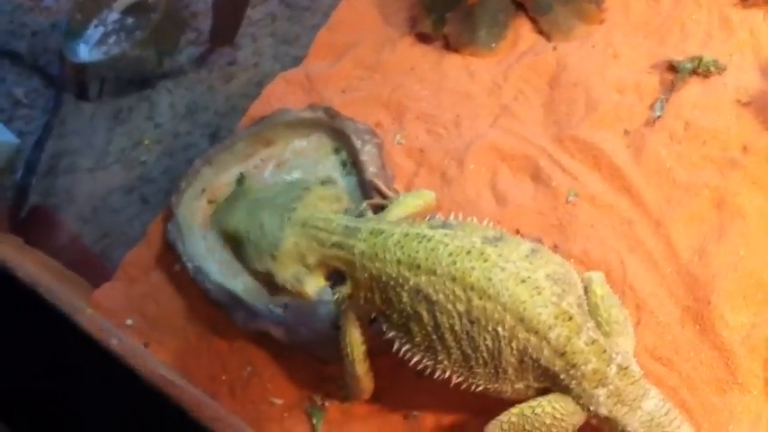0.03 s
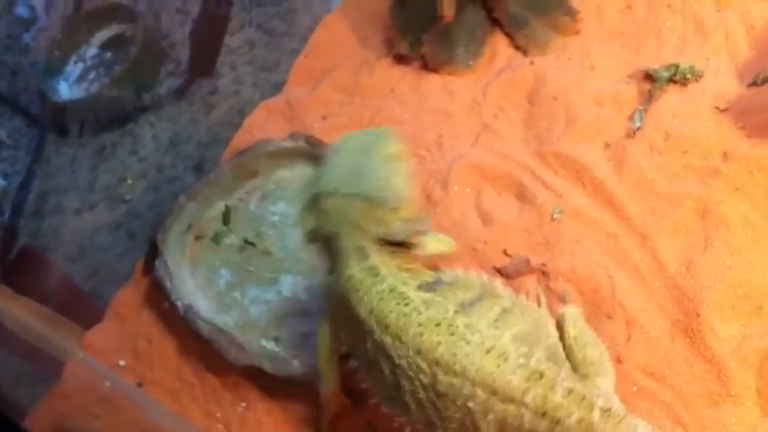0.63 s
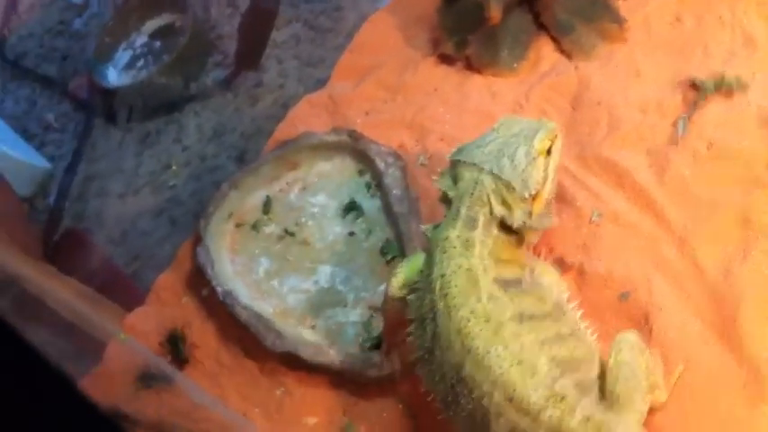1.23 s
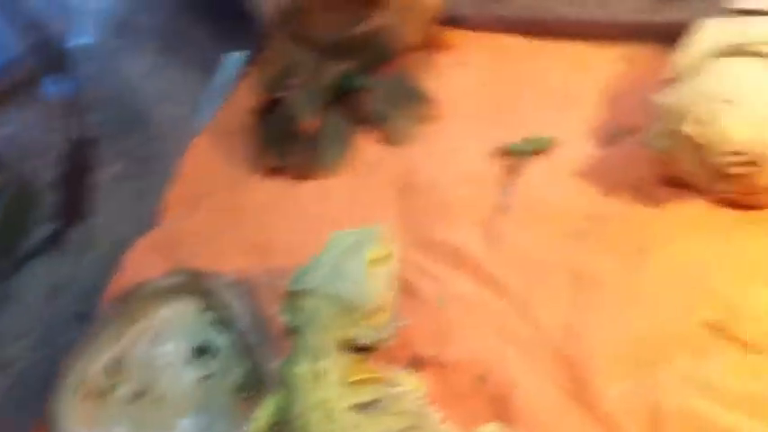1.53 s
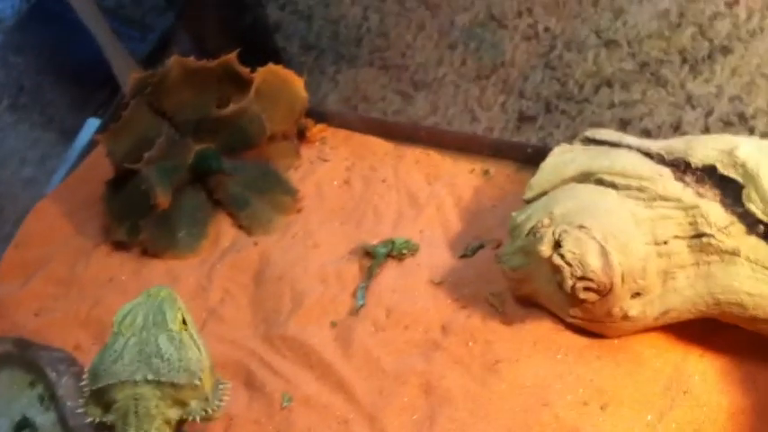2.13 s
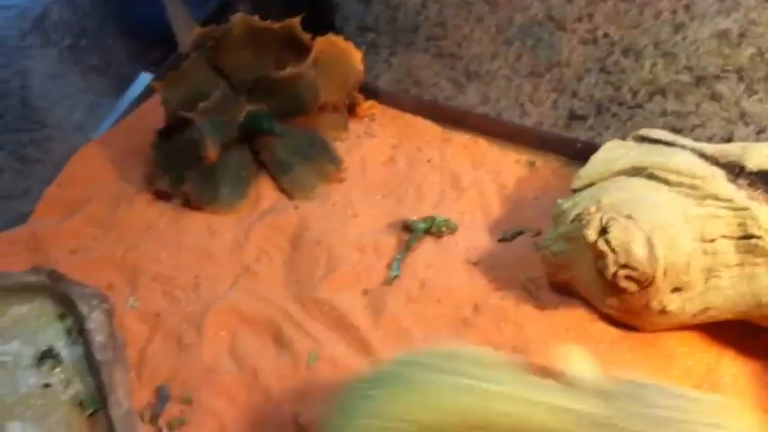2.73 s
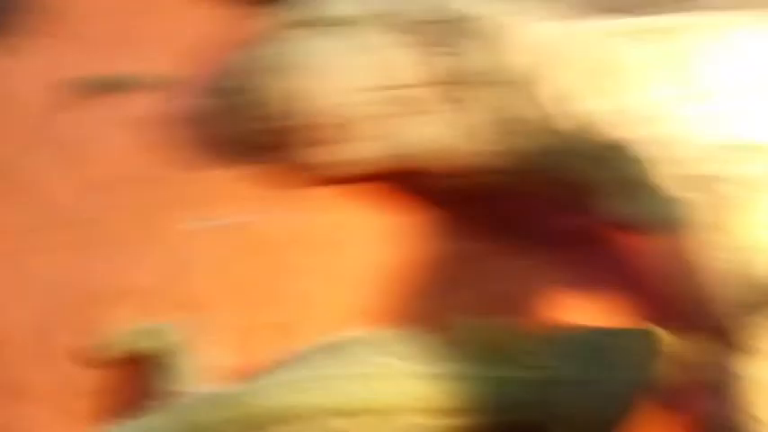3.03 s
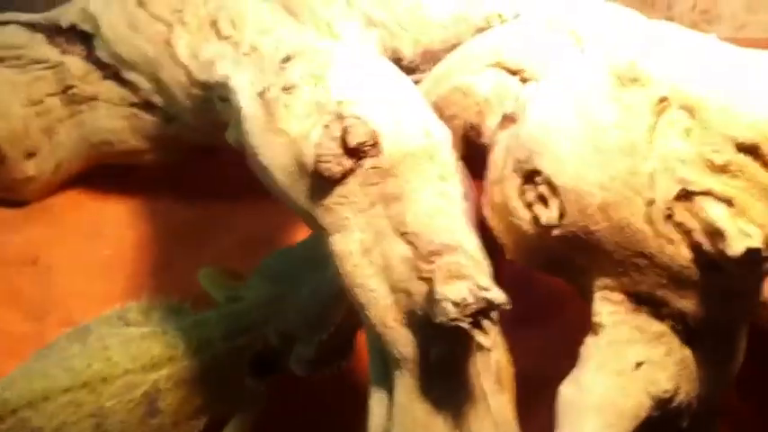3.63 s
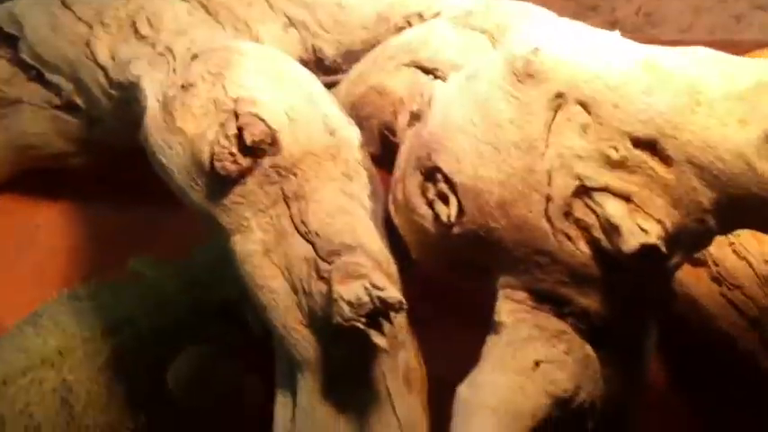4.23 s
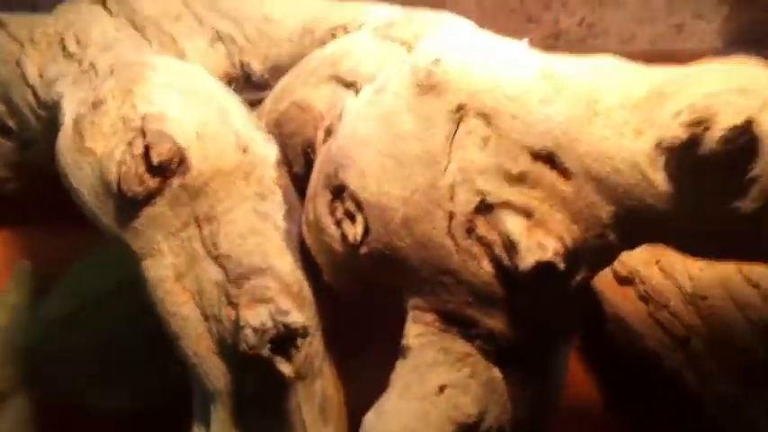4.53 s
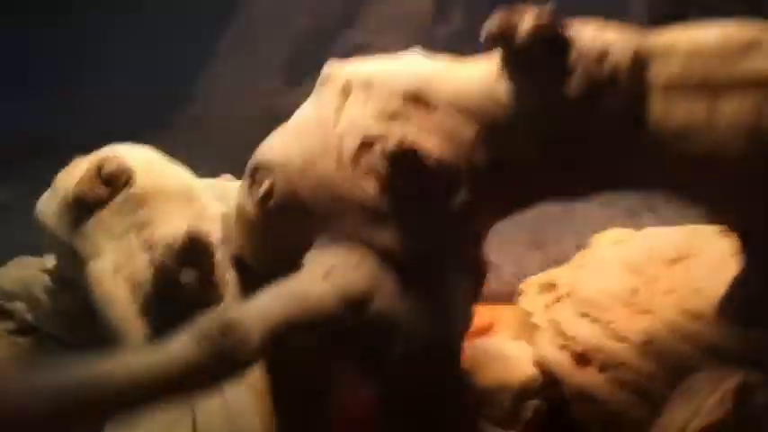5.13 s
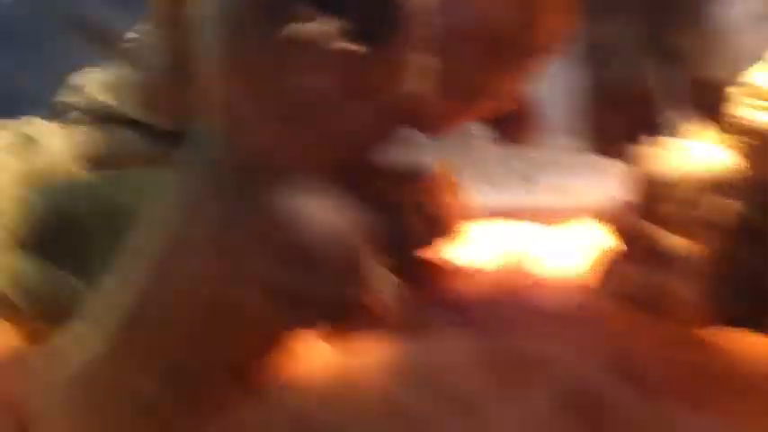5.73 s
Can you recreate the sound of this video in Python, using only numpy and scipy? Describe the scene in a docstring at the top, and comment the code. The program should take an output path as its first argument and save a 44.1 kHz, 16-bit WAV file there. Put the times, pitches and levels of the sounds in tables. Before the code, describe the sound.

A lizard's claws tick and scrape over sand, with soft thumps and a sharp snap on wood, then microphone handling noise over faint hiss.

```python
"""Claws and scales tick on grit as a lizard leaves its stone dish and scurries over sand to driftwood
in a glass tank. Its belly drags with a rasp of sliding friction, its steps drive the low modes of the
tank floor, and a claw slips and snaps against the wood. Near the end the hand-held camera adds a few
clicks, the rumble of a shifting grip and a brushing swish. Hiss and a faint hum lie underneath."""
import sys
import numpy as np
from scipy import signal
from scipy.fft import rfft, irfft, next_fast_len
from scipy.io import wavfile

SR = 44100
rng = np.random.default_rng(int(sys.argv[2]) if len(sys.argv) > 2 else 0)


def transcribe(u):
    """Save the signal u as a 16-bit wav file named by the first command-line argument.

    u: samples, shape (n,) or (channels, n), limited to [-1, 1]; the rate is SR.
    q: integer samples, one column per channel.
    """
    v = np.clip(np.atleast_2d(u).T, -1, 1)
    q = np.round(v * 32767).astype(np.int16)
    wavfile.write(sys.argv[1], SR, q)


N = 264159
TIME = np.arange(N) / SR
SWELL_DB = 19   # a swell gains this much over its rise time and loses it over its fall time


def from_db(db):
    """Amplitude ratio of a level in decibels."""
    return 10 ** (np.asarray(db) / 20)


def rms_one(x):
    """Normalisation to unit rms."""
    return x / np.sqrt(np.mean(x ** 2) + 1e-20)


def butterworth(x, order, hz, kind):
    """Filter with a maximally flat passband."""
    return signal.sosfilt(signal.butter(order, hz, kind, fs=SR, output="sos"), x)


def colour(x, spectrum):
    """Minimum-phase filter of unit power gain: a spectrum sets the timbre, not the level."""
    size = next_fast_len(N + SR // 4, True)
    size += size % 2
    hz, db = np.transpose(spectrum)
    bin_hz = np.arange(size // 2 + 1) * SR / size
    gain = rms_one(from_db(np.interp(np.log(bin_hz + 1), np.log(hz), db)))
    cepstrum = irfft(np.log(gain))
    cepstrum[1:size // 2] *= 2   # folding the cepstrum makes the filter causal
    cepstrum[size // 2 + 1:] = 0
    return irfft(rfft(x, size) * np.exp(rfft(cepstrum)), size)[:N]


def grain_sizes(spread_db, hold):
    """Log-normal grain amplitudes, each lasting `hold` samples; unit rms."""
    sizes = from_db(spread_db * np.clip(rng.standard_normal(N // hold + 1), -2, 2))
    return rms_one(np.repeat(sizes, hold)[:N])


def grains(spread_db, hold):
    """Granular noise: white noise modulated by grains of uneven size."""
    return rng.standard_normal(N) * grain_sizes(spread_db, hold)


def rasp(patchy_db, patch_s=0.022, bands=30):
    """Friction excites ever-changing resonances: narrow noise bands swell independently; unit rms."""
    edges_hz = np.geomspace(250, 12000, bands + 1)
    knots_s = np.arange(0, N / SR + patch_s, patch_s)
    gains = from_db(patchy_db * np.clip(rng.standard_normal((bands, len(knots_s))), -2, 2))
    white = rng.standard_normal((2, N))
    out = np.zeros(N)
    for k in range(bands):
        band = butterworth(white[k % 2], 2, edges_hz[k:k + 2], "band")
        out += band * np.interp(TIME, knots_s, gains[k])
    return rms_one(out)


def swell_db(time, peak_s, rise_s, fall_s):
    """Exponential growth and decay: straight lines in dB that meet at 0 dB."""
    return -SWELL_DB * np.maximum((peak_s - time) / rise_s, (time - peak_s) / fall_s)


def swells(times, rises, falls, levels_db):
    """Envelope of incoherent swells, which add in power."""
    power = np.zeros(N)
    for s, rise, fall, db in np.broadcast(times, rises, falls, levels_db):
        near = slice(*np.searchsorted(TIME, [s - 3 * rise, s + 3 * fall]))
        power[near] += from_db(db + swell_db(TIME[near], s, rise, fall)) ** 2
    return np.sqrt(power)


def bursts(times, levels_db, t60s):
    """Envelope of impacts: each jumps up and decays exponentially, and their powers add."""
    power = np.zeros(N)
    for s, db, t60 in np.broadcast(times, levels_db, t60s):
        at = round(s * SR)
        age = TIME[:min(N - at, SR // 2)]
        power[at:at + len(age)] += from_db(db - 60 * age / t60) ** 2
    return np.sqrt(power)


def ring(start_s, level_db, hz, t60):
    """Impulse response of one damped mode: a decaying sine."""
    impulse = np.zeros(N)
    impulse[round(start_s * SR)] = from_db(level_db)
    radius, angle = from_db(-60 / (t60 * SR)), 2 * np.pi * hz / SR
    return signal.lfilter([0, np.sin(angle)], [1, -2 * radius * np.cos(angle), radius ** 2],
                          impulse + 1e-18)


def struck(modes, times, levels_db, t60_factors, pushes_s, spread_db):
    """Modal superposition: a contact excites every mode unevenly; a slow push softens the onset."""
    out = np.zeros(N)
    for s, level, factor, push in np.broadcast(times, levels_db, t60_factors, pushes_s):
        for (hz, db, base_t60), chance in zip(modes, rng.standard_normal(len(modes))):
            t60 = base_t60 * factor
            near = slice(*np.searchsorted(TIME, [s, s + t60]))
            age = TIME[near] - s
            build = 1 - np.exp(-age / max(push, 1 / SR))
            decay = from_db(level + db + spread_db * chance - 60 * age / t60)
            out[near] += build * decay * np.sin(2 * np.pi * hz * age)
    return out


def background(hiss_db=-62.5):
    """Stationary noise floor: broadband microphone hiss and the line spectrum of the tank's equipment."""
    # The hum. Each row: frequency in Hz, rms level in dB.
    hum_lines = [(120, -78), (152, -80.5), (360, -81.5)]
    # The hiss. Each row: frequency in Hz, relative density in dB.
    hiss_spectrum = [(25, -16.5), (60, -23), (88, -13.5), (112, -7), (150, 3), (200, -1.5), (260, -6.5),
                     (380, -6.5), (600, -11), (1500, -16), (3300, -15), (8000, -17.5), (14000, -15.5),
                     (16000, -18)]
    hum = sum(from_db(db) * np.sqrt(2) * np.sin(2 * np.pi * (hz * TIME + rng.random()))
              for hz, db in hum_lines)
    return hum + from_db(hiss_db) * colour(rng.standard_normal(N), hiss_spectrum)


def camera_grip():
    """Structure-borne noise: the shifting hand rumbles, and the camera's body flexes lower still."""
    # Shifts of grip. Each row: peak time, rise and fall in seconds, rumble and flex levels in dB.
    grips = [(4.989, 0.15, 0.1, -55.5, -81), (5.245, 0.037, 0.14, -51.5, -75), (5.5, 1, 0.42, -56, -83),
             (5.527, .006, 0.1, -51, -82), (5.755, 0.067, 0.12, -53, -57), (5.815, .04, .2, -53, -61)]
    # The hand's rumble and the body's flexing. Each row: frequency in Hz, relative density in dB.
    rumble_spectrum = [(18, -64), (30, -47), (92, -10.5), (130, -4.5), (167, 0.5), (246, 2), (373, -3),
                       (407, -3), (600, -10.5), (780, -28), (1320, -120)]
    flex_spectrum = [(30, -28), (60, -24), (88, -3), (130, -7.5), (250, -28.5)]
    s, rise, fall, rumble_db, flex_db = np.transpose(grips)
    rumble = swells(s, rise, fall, rumble_db) * grains(1.0, hold=400)
    flex = swells(s, rise, fall, flex_db) * rng.standard_normal(N)
    return colour(rumble, rumble_spectrum) + colour(flex, flex_spectrum)


def camera_brush(touch_s=5.1, touch_db_per_s=150, lift_s=5.9, lift_db_per_s=68, hiss_db=-49, rub_db=-57):
    """Sliding friction of something soft on the camera: smooth hiss, a catching rub, a late sizzle."""
    # The three parts of the stroke. Each row: frequency in Hz, relative density in dB.
    hiss_spectrum = [(1500, -14), (3000, 0), (6000, 1), (9000, 2.5), (13000, 1), (15500, 1)]
    rub_spectrum = [(240, -20), (400, -3), (543, -11.5), (778, -5.5), (1210, -16), (1700, -10.5),
                    (2100, -14), (2600, -13.5), (3350, -19.5), (4300, -22), (4720, -16), (5100, -16),
                    (6500, -20.5), (11000, -120)]
    sizzle_spectrum = [(3000, -20), (6000, -13), (10000, 2), (14000, 4), (16000, 0)]
    stroke_db = swell_db(TIME, peak_s=5.519, rise_s=0.51, fall_s=0.52)
    stroke_db -= lift_db_per_s * np.maximum(TIME - lift_s, 0)
    touch_db = touch_db_per_s * np.minimum(TIME - touch_s, 0)
    # the rub follows about half of the stroke's swing in dB
    rub = from_db(rub_db + 0.53 * stroke_db + touch_db) * rasp(patchy_db=5)
    sizzle = swells([5.64], rises=0.3, falls=0.41, levels_db=-53.5) * grains(4.9, hold=32)
    hiss = from_db(hiss_db + stroke_db + touch_db) * grains(1.2, hold=32)
    return colour(hiss, hiss_spectrum) + colour(rub, rub_spectrum) + colour(sizzle, sizzle_spectrum)


def camera_clicks(after_ring_db=-21, after_ring_t60=0.086):
    """Impulse response of a shell giving under the fingers: two damped modes and a dull after-ring."""
    # Clicks. Each row: start in seconds, then level in dB, frequency in Hz and T60 in seconds,
    # first for the snap mode and again for the body mode.
    clicks = [(4.9465, -19.5, 2600, 0.0013, -35, 895, 0.0073), (4.986, -40, 2400, .0015, -33.5, 1186, .003),
              (5.4857, -14, 2430, 0.0026, -31, 1110, .0025), (5.9057, -28, 2100, 0.0053, -25.5, 770, 0.008)]
    # The shell's after-ring. Each row: frequency in Hz, relative density in dB.
    shell_spectrum = [(100, -25), (180, 4), (260, -7), (480, 2), (760, -1), (1200, -2.5), (2200, -9),
                      (5000, -15.5), (15000, -17)]
    pulses = sum(ring(at, snap_db, snap_hz, snap_t60) + ring(at, body_db, body_hz, body_t60)
                 for at, snap_db, snap_hz, snap_t60, body_db, body_hz, body_t60 in clicks)
    pulses = butterworth(pulses, 2, 400, "high")
    pulses = butterworth(pulses, 1, 8000, "low")
    s, snap_db = np.transpose(clicks)[:2]
    after_ring = bursts(s, snap_db + after_ring_db, after_ring_t60) * rng.standard_normal(N)
    return pulses + colour(after_ring, shell_spectrum)


def brief_resonances():
    """Narrow-band noise: scrapes, squeaks, the tank ringing after a thump, the camera after a click."""
    # Each row: centre time and length in seconds, frequency and bandwidth in Hz, level in dB.
    resonances = [(0.11, 0.0033, 7040, 2030, -53.5), (0.173, 0.017, 1480, 700, -61),
                  (0.203, 0.022, 14200, 1500, -43), (0.207, 0.021, 5300, 700, -54),
                  (0.415, 0.0073, 424, 400, -58.5), (0.53, .018, 3350, 200, -68),
                  (0.788, 0.038, 168, 50, -58), (0.883, .045, 171, 50, -55), (0.904, 0.02, 1340, 1000, -60),
                  (1.325, .018, 3240, 160, -68), (1.554, .01, 3150, 1800, -61),
                  (1.71, .005, 7000, 1500, -59.5), (1.894, 0.028, 3800, 300, -68.5),
                  (1.962, 0.002, 8400, 1200, -50), (1.976, .003, 6800, 1100, -51.5),
                  (2.214, 0.14, 2680, 1200, -70.5), (2.44, 0.027, 3500, 200, -65.5),
                  (2.481, 0.016, 1250, 250, -69), (2.723, 0.03, 464, 350, -53.5),
                  (2.878, 0.043, 1890, 1300, -60.5), (2.984, 0.11, 2570, 300, -61.5),
                  (2.972, 0.01, 3800, 2400, -53), (2.998, 0.017, 3940, 298, -51.5),
                  (3.021, .01, 5000, 1400, -54), (3.091, 0.006, 3580, 3000, -49),
                  (3.1, 0.064, 1120, 460, -51.5), (3.105, .03, 3600, 3600, -54.5),
                  (3.145, .05, 850, 90, -56.5), (3.15, 0.013, 302, 69.8, -45.5),
                  (3.167, 0.033, 530, 30, -48.5), (3.232, 0.013, 2100, 900, -58),
                  (4.166, 0.053, 2730, 2430, -60), (4.28, .1, 13500, 3000, -70),
                  (4.642, 0.25, 1670, 260, -66.5), (4.73, 0.011, 8500, 1400, -55.5),
                  (4.74, 0.022, 346, 60, -42.5), (4.79, 0.041, 2680, 700, -68),
                  (4.95, 0.0064, 755, 200, -45), (4.967, 0.014, 617, 120, -50.5),
                  (4.965, 0.029, 1905, 130, -58.5), (5.143, 0.015, 1100, 906, -56),
                  (5.18, 0.018, 1330, 800, -58), (5.23, 0.031, 920, 700, -56.5),
                  (5.232, .025, 11500, 6000, -61), (5.248, 0.02, 2520, 700, -61),
                  (5.342, .014, 1160, 900, -58.5), (5.48, 0.05, 2580, 600, -55),
                  (5.65, 0.12, 2540, 900, -58.5), (5.728, 0.022, 4600, 1800, -59),
                  (5.882, 0.086, 1880, 700, -59.5)]
    out, noise = np.zeros(N), grains(1.6, hold=100)
    for s, length, hz, width, db in resonances:
        edges_hz = [max(hz - width / 2, 50), hz + width / 2]
        band = signal.butter(1, edges_hz, "band", fs=SR, output="sos")
        near = slice(*np.searchsorted(TIME, [s - length - .05, s + length + .05]))
        swell = np.exp(-2 * ((TIME[near] - s) / length) ** 2)
        sound = swell * signal.sosfilt(np.vstack([band, band]), noise[near])
        out[near] += from_db(db) * rms_one(sound) * np.sqrt(np.mean(swell ** 2))
    return out


def sand_drag(rub_trim_db=-1.5, grit_trim_db=-3):
    """Granular friction: scales slide over sand with a rasping rub under a spray of fine grains."""
    # The lizard shuffles at the dish, dashes, skids at the wood and crawls under it.
    # Each row: peak time, rise and fall in seconds, rub and grit levels in dB before the trims.
    slides = [(0.27, .28, 2.7, -71, -60.5), (0.90, 0.26, 0.14, -64.5, -73), (1.7, 2.1, 3, -77, -71),
              (2.72, 0.34, 0.63, -60, -58), (3.01, 0.41, 0.057, -58, -52.5),
              (3.133, 0.084, 0.12, -49.5, -45), (4.18, 0.72, 0.61, -74, -62.5),
              (4.81, 0.77, 0.33, -58, -56)]
    # The rub and the fine grit. Each row: frequency in Hz, relative density in dB.
    rub_spectrum = [(120, -24.5), (300, -4), (550, 3), (900, -2.5), (1300, -0.5), (1750, 1.5), (2100, -1.5),
                    (2600, -4.5), (3200, -5.5), (4000, -11), (6000, -9), (9000, -33), (14000, -17)]
    grit_spectrum = [(2000, -18.5), (4000, -2), (6000, 0), (10000, 1.5), (15500, -1)]
    s, rise, fall, rub_db, grit_db = np.transpose(slides)
    rub = swells(s, rise, fall, rub_db + rub_trim_db) * rasp(patchy_db=4.5) * grain_sizes(2.3, hold=256)
    grit = swells(s, rise, fall, grit_db + grit_trim_db) * grains(3.3, hold=48)
    return colour(rub, rub_spectrum) + colour(grit, grit_spectrum)


def tank_thumps(boom_db=-3, shake_db=-23, shake_t60=0.54, knock_t60=0.16):
    """Plate vibration: soft feet set the floor panel booming and shake the things that stand on it."""
    # Steps and bumps, whose ring the lizard's weight damps. Each row: start in seconds,
    # reference level for boom and shake in dB, knock level in dB, T60 factor, push time in seconds.
    thumps = [(0.76, -57.5, -67, 0.85, .003), (0.871, -47, -63.5, .8, .002), (0.929, -50.5, -65, 1, 0.0032),
              (2.717, -47.5, -49, 0.91, .001), (2.842, -40.5, -69, 0.46, 0.0017),
              (2.953, -39.5, -68, 1.23, .002), (3.1437, -29.5, -46, 0.98, .002),
              (3.1628, -34, -70, 0.51, .002), (3.2206, -38, -90, 0.76, 0.0046),
              (4.5417, -41, -63, 0.59, .001), (4.598, -51, -59, 0.83, .004),
              (4.7321, -26.5, -58, 0.59, .001), (4.7496, -26.5, -66, 0.58, .002),
              (4.7906, -33, -53, 0.46, 0.0027), (4.8531, -40, -76, 0.91, .003),
              (5.238, -66, -50.5, .8, .001)]
    # The floor's modes. Each row: frequency in Hz, relative level in dB, base T60 in seconds.
    floor_modes = [(158, -6, 0.4), (178.6, -0.5, 0.37), (219.4, -6.5, 0.37), (262, -31, 0.14),
                   (329, -11, 0.14)]
    # The panel's knock and the shaking. Each row: frequency in Hz, relative density in dB.
    knock_spectrum = [(200, -31), (330, 1), (430, -4.5), (522, 8), (600, -8), (720, -1.5), (1300, -6),
                      (3000, -28)]
    shake_spectrum = [(40, -15), (100, -52), (130, -19), (160, 7), (230, -7), (280, -7), (400, -23),
                      (900, -37)]
    s, level_db, knock_db, t60_factor, push_s = np.transpose(thumps)
    boom = struck(floor_modes, s, level_db + boom_db, t60_factor, push_s, spread_db=1.1)
    # a padded foot pushes gently, and the small panel radiates no deep bass
    boom = butterworth(boom, 2, [125, 420], "band")
    boom = butterworth(boom, 2, 115, "high")
    shake = bursts(s, level_db + shake_db, shake_t60 * t60_factor) * rng.standard_normal(N)
    knock = bursts(s, knock_db, knock_t60) * rng.standard_normal(N)
    return boom + colour(shake, shake_spectrum) + colour(knock, knock_spectrum)


def claw_snap(ring_db=-3, crack_db=-13, tail_db=-24):
    """Stick-slip: a claw bites in and slips off in quick jerks; so small a part radiates no bass."""
    # The claw catches on grit, then snaps against wood. Each row: start in seconds,
    # reference level for ring, crack and tail in dB, bite level in dB.
    snaps = [(2.925, -51, -60), (3.0452, -50, -60), (3.0618, -39, -30), (3.0635, -22, -31),
             (3.0653, -22.5, -45), (3.0695, -29.5, -50), (3.0887, -42, -70)]
    # The snap's modes. Each row: frequency in Hz, relative level in dB, base T60 in seconds.
    claw_modes = [(1570, -16, 0.055), (1700, -23, 0.059), (1950, -26, 0.04), (2460, -20, 0.031),
                  (3080, -21, 0.018), (3555, -17, 0.036), (3880, -23, 0.045), (4450, -4, 0.013),
                  (4570, -7, 0.019), (5380, -15, 0.019), (6100, -18, 0.02), (6870, -18, 0.016),
                  (8600, -13, 0.013)]
    # The tip's bright bite and the crack. Each row: frequency in Hz, relative density in dB.
    bite_spectrum = [(1500, -22), (4000, 0), (7000, 1), (8500, 0), (11000, -14), (13500, -4), (16000, -14)]
    crack_spectrum = [(400, -32), (1000, -11), (1500, -5), (2200, 1), (4500, 4), (8000, -8.5),
                      (15000, -13)]
    s, level_db, bite_db = np.transpose(snaps)
    ringing = struck(claw_modes, s, level_db + ring_db, t60_factors=0.95, pushes_s=0, spread_db=4.5)
    envelope = bursts(s, level_db + crack_db, t60s=0.015) + bursts(s, level_db + tail_db, t60s=0.14)
    crack = colour(envelope * rng.standard_normal(N), crack_spectrum)
    bite = colour(bursts(s, bite_db, t60s=0.0065) * rng.standard_normal(N), bite_spectrum)
    return butterworth(ringing + crack + bite, 2, 900, "high")


def stray_ticks(count=28, until_s=3.6, rise_s=0.004, fall_s=0.007, top_db=-56.5, body_db=-68.5):
    """A random point process: faint ticks at uniformly drawn times, as rows for claw_ticks."""
    when, top, body = rng.random((64, 3))[:count].T
    top_scatter_db, body_scatter_db = 4 * (2 * top - 1), 4 * (2 * body - 1)
    return np.column_stack([when * until_s, np.full((count, 2), [rise_s, fall_s]),
                            top_db + top_scatter_db, body_db + body_scatter_db])


def claw_ticks(top_trim_db=-8.5, body_trim_db=2.5, tail_db=-22, tail_t60=0.16, body_fall_s=0.016):
    """Brittle fracture: each touch cracks a few grains; reflections off the glass add a short tail."""
    # The louder crunches of claws and scales on grit. Each row: peak time, rise and the top's fall
    # in seconds, levels of the crisp top and the lower body in dB before the trims.
    ticks = [(0.04, .002, 0.0047, -49, -65), (0.1097, .002, .006, -47, -61.5),
             (0.1897, .001, .002, -38, -61), (0.1963, .0015, .002, -22.5, -54.5),
             (0.1985, .002, .006, -34, -58), (0.2026, .002, .005, -28.5, -56),
             (0.2148, .002, .003, -32, -58), (0.219, .006, .02, -46, -64), (0.406, .005, .007, -35, -59),
             (0.4157, 0.0055, .005, -38, -60.5), (0.426, .002, .003, -49, -66),
             (0.4337, .001, .002, -36, -65), (0.4625, .002, .004, -45, -75),
             (0.5915, .001, .008, -38.5, -78), (0.638, .003, .006, -43.5, -73),
             (0.6872, 0.0054, .012, -46, -56.5), (0.694, .005, .01, -58, -59),
             (1.174, .003, .01, -45.5, -69), (1.541, .002, .01, -49, -55), (1.607, .012, .014, -55, -59.5),
             (1.94, 0.022, .02, -49, -65), (1.955, .005, 0.0065, -36, -70),
             (1.9618, .001, 0.0036, -30.5, -67), (1.966, .003, .008, -47, -70),
             (1.9733, .001, .006, -37, -63), (2.274, .006, .01, -48, -64),
             (2.5985, 0.0081, .012, -37.5, -59), (2.6095, .005, .012, -36, -63),
             (2.667, .004, .015, -45, -63), (2.921, 0.006, .015, -49, -50.5),
             (2.9416, .002, .005, -42, -64), (2.9515, .001, .007, -36.5, -51), (3.14, .011, .01, -39, -45),
             (3.3335, .002, .006, -54, -63), (4.058, .001, .004, -48, -61), (4.067, .006, .008, -60, -58),
             (4.4785, .001, .005, -44, -59), (4.66, .002, .005, -47, -71), (4.669, .003, .012, -47, -70),
             (4.732, .012, 0.015, -47, -62), (4.7575, .0015, .018, -40, -62),
             (4.8392, .002, .008, -42, -62), (4.8623, .002, 0.0082, -39, -50),
             (4.881, .004, .015, -48, -64), (4.965, 0.0073, .009, -45, -60),
             (4.976, 0.0033, .006, -43, -63)]
    # A tick's crisp top and lower body. Each row: frequency in Hz, relative density in dB.
    top_spectrum = [(3000, -24), (7000, -10), (10000, -2), (12000, 2), (14300, 2.5), (15500, 2),
                    (17000, -35)]
    body_spectrum = [(60, -22), (200, -10), (500, -5.5), (2000, -4.5), (4000, -5), (5800, 2), (8000, -3),
                     (12000, -26)]
    s, rise, fall, top_db, body_db = np.vstack([ticks, stray_ticks()]).T
    crunch = swells(s, rise, fall, top_db + top_trim_db)
    tail = bursts(s, top_db + top_trim_db + tail_db, tail_t60)
    top = (crunch + tail) * grains(1.6, hold=16)
    body = swells(s, rise, body_fall_s, body_db + body_trim_db) * grains(3.0, hold=24)
    return colour(top, top_spectrum) + colour(body, body_spectrum)


def scene():
    """Superposition: all sources add at one microphone, which feeds both channels."""
    lizard = claw_ticks() + tank_thumps() + claw_snap() + sand_drag()
    mono = lizard + brief_resonances() + camera_clicks() + camera_brush() + camera_grip() + background()
    return np.stack([mono, mono])


def record(dry):
    """Band limiting: an elliptic low-pass cuts the treble steeply above 15.9 kHz."""
    return signal.sosfilt(signal.ellip(12, .1, 70, 15900, fs=SR, output="sos"), dry)


dry = scene()
out = record(dry)
transcribe(out)
```